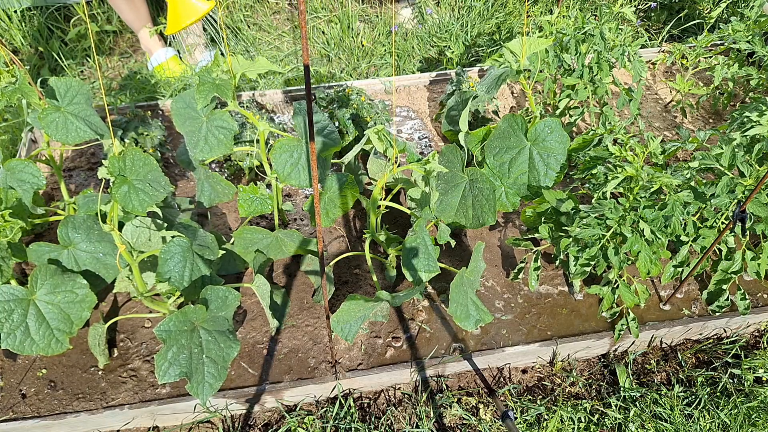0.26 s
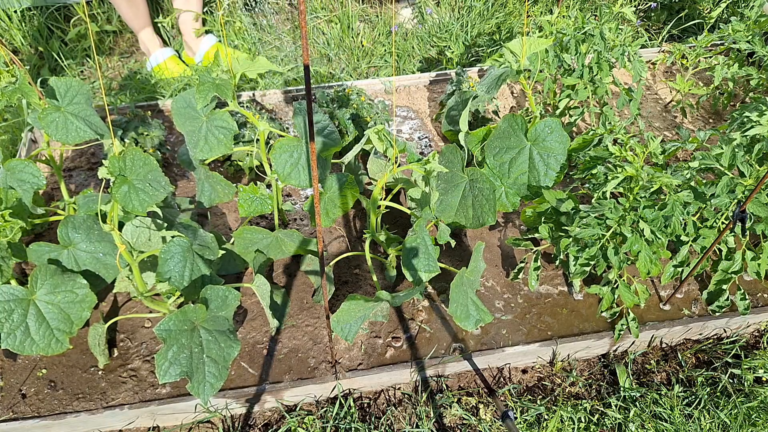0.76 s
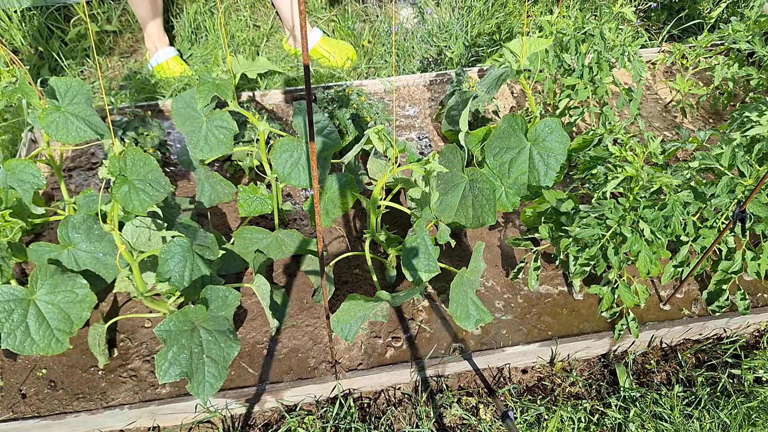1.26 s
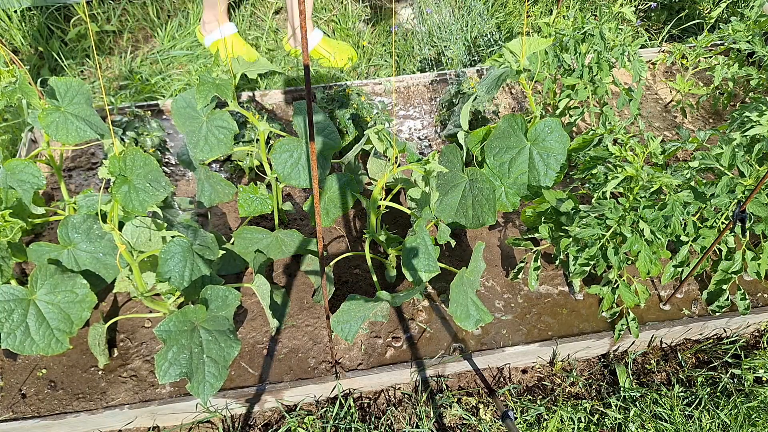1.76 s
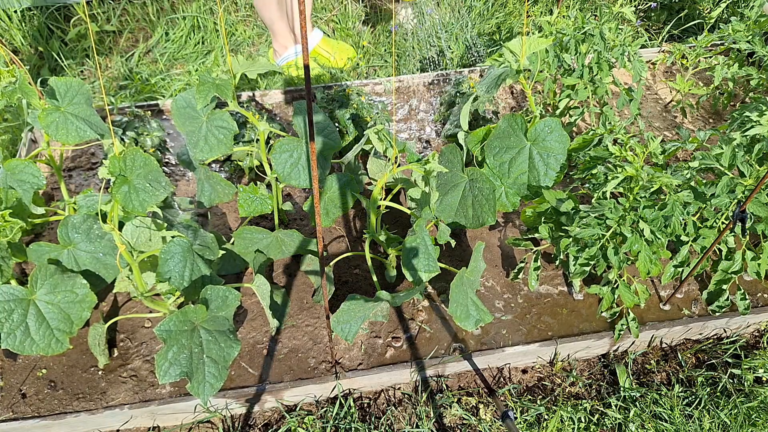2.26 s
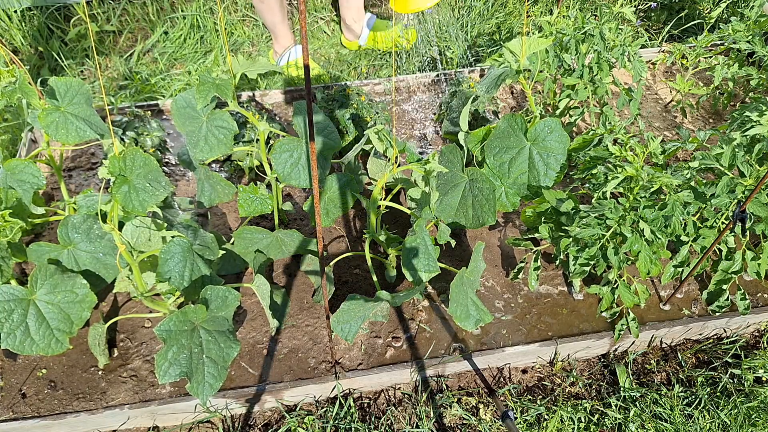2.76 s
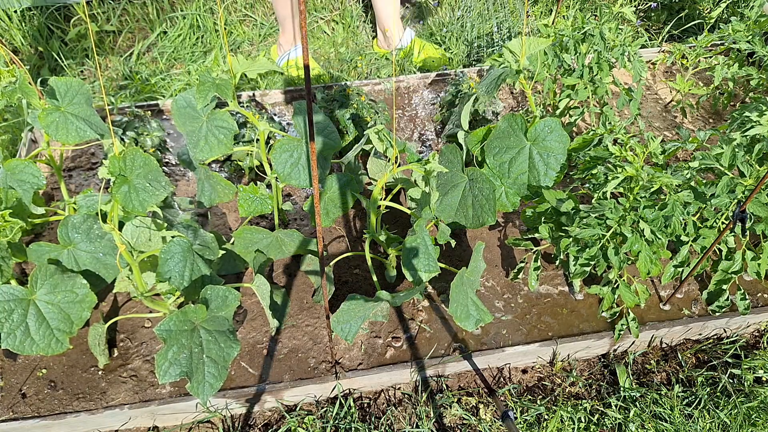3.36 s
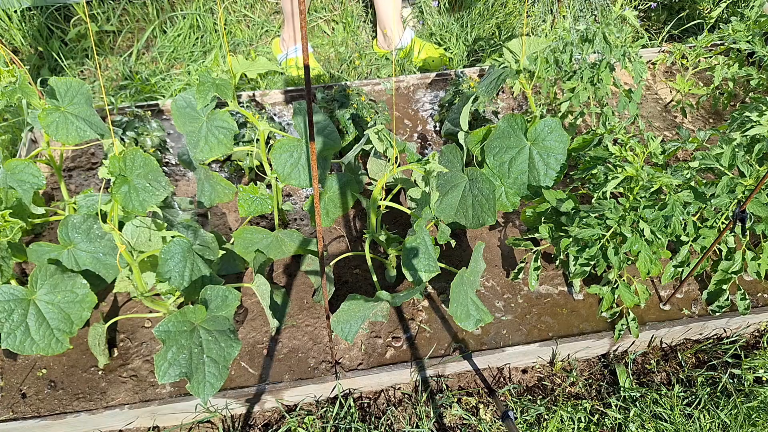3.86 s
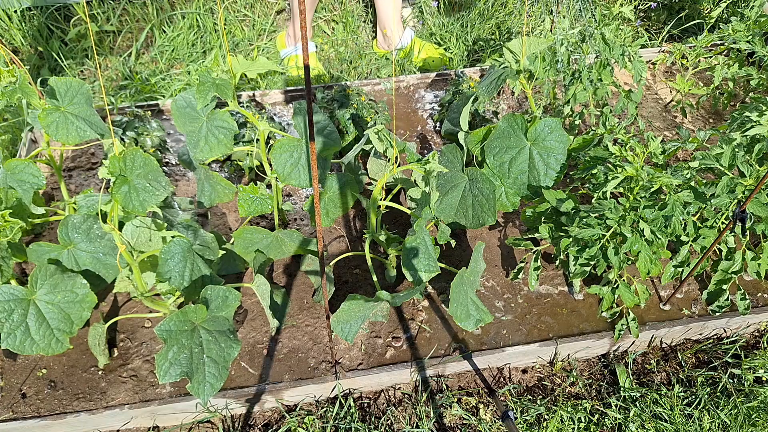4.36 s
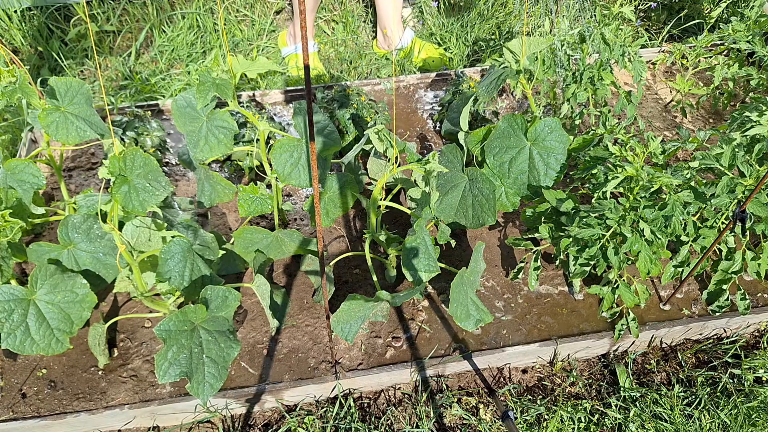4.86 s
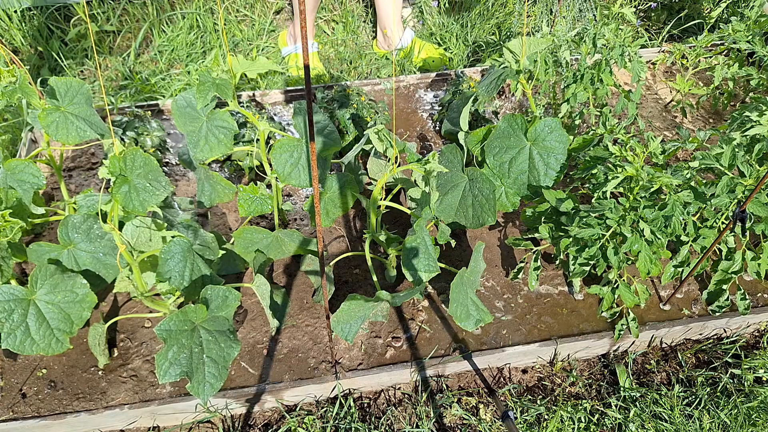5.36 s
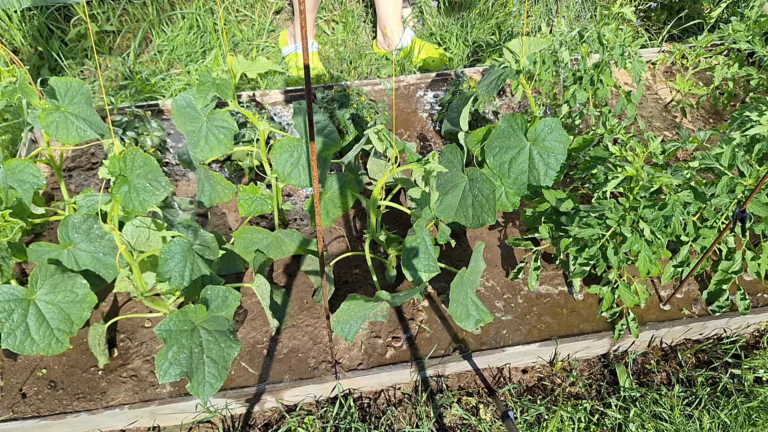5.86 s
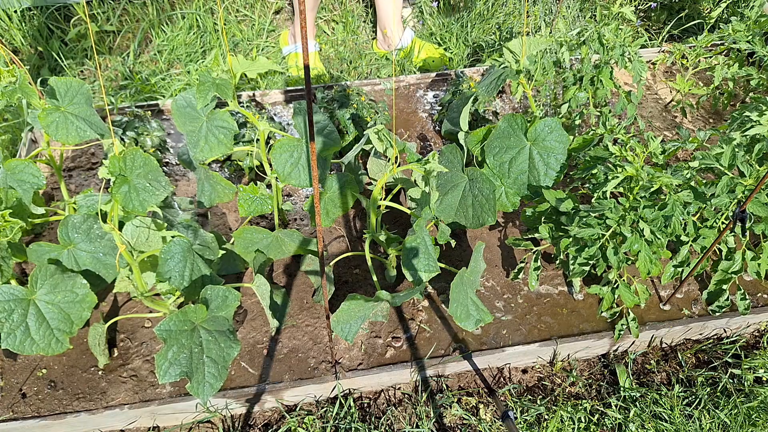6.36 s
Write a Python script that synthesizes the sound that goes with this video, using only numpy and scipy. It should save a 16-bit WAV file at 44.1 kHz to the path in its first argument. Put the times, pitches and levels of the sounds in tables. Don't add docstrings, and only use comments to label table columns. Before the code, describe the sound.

Fine watering-can spray hisses over leaves and wet soil as a nearby warbler sings scratchy phrases and wind thumps the microphone.

```python
import sys
import numpy as np
from scipy import signal
from scipy.fft import rfft, irfft, next_fast_len
from scipy.io import wavfile
from scipy.ndimage import uniform_filter1d

SR = 44100
rng = np.random.default_rng(int(sys.argv[2]) if len(sys.argv) > 2 else 0)


def to_wav(sig):
    pcm = np.clip(np.atleast_2d(sig), -1, 1) * 32767
    pcm = np.round(pcm).astype(np.int16)
    wavfile.write(sys.argv[1], SR, pcm.T)


def boost(x):
    u = np.asarray(x, float) / 20
    return 10 ** u


N = 291060

# (time [s], spray level [dB], share caught by leaves [dB])
FLOW = [(0.0, -57.5, -1.5), (.3, -58.5, -4), (1.1, -58, -3), (1.55, -60, -9), (1.95, -58.5, -3),
        (2.35, -57.5, -8), (2.6, -56, -5), (3.2, -55, -10), (3.4, -61, -6.5), (3.9, -67, -5.5),
        (4.25, -59.5, -6.5), (4.55, -61.5, -5.5), (4.95, -56, -3), (5.3, -62.5, -3.5), (5.5, -60, -12),
        (5.75, -59, -7), (6.6, -59.5, -3.5)]
# (time [s], length [s], change [dB])
FLOW_SWINGS = [
    (0.342, 0.073, -5),
    (1.261, 0.14, -4.5),
    (1.51, 0.29, -2),
    (3.714, 0.054, 3.5),
    (3.843, 0.083, -2.5),
    (4.024, 0.032, 5),
    (5.211, 0.083, -5),
    (5.728, 0.1, 3.5),
    (6.42, 0.15, -2),
]
# (time [s], length [s], splash level [dB])
SOIL_GAPS = [
    (0.0, 0.074, -67),
    (0.752, 0.53, -66.5),
    (1.335, 0.35, -68.5),
    (1.72, 0.4, -65.5),
    (2.478, 0.85, -67.5),
    (4.79, 0.4, -72.5),
    (5.505, 0.19, -74.5),
    (5.728, 0.088, -88),
]
# (time [s], length [s], fizz level [dB])
PUDDLE_HITS = [
    (5.662, 0.21, -61.5),
    (5.895, 0.12, -61.5),
    (6.005, 0.236, -67),
    (6.21, 0.28, -66.5),
]
# (frequency [Hz], level [dB])
SPRAY_COLOUR = [(2650, -24), (4500, -2.5), (5000, -18), (6130, -5), (9650, 1.5), (12100, 2.5), (13600, 1.5),
                (15100, 4), (15900, 1.5)]
# (frequency [Hz], level [dB])
SPLASH_COLOUR = [(470, -18), (800, -15), (1020, -8), (1250, -6), (1630, -9), (2410, -8.5), (4600, -7.5),
                 (6500, -16), (11000, -120)]
# (frequency [Hz], level [dB])
LEAF_COLOUR = [(2200, -30), (3500, -20), (4500, -10), (5200, -3), (6500, -1), (7900, 2), (10000, -16)]
# (frequency [Hz], level [dB])
FIZZ_COLOUR = [(1800, -30), (2500, -5.5), (3200, -2), (4200, -2), (5400, -22)]
# (time [s], peak [dB], pitch [Hz], left-right [dB])
LEAF_DROPS = [(0.081, -43, 6980, -1), (0.6868, -46.5, 7350, 25), (1.144, -41, 12700, -2),
              (1.2635, -37, 7460, -3), (1.5046, -46, 7940, -8), (1.5244, -42, 13600, -11),
              (1.5683, -42.5, 8460, -8), (1.6759, -41, 7500, -10), (1.7686, -44.5, 10200, -1),
              (1.8512, -40.5, 7050, -5), (2.0288, -42, 13200, -4.5), (2.0946, -38.5, 12600, -4),
              (2.5034, -42, 13500, -3), (2.5825, -43, 12200, 16), (2.9562, -38, 8000, -7),
              (2.9941, -37, 14100, -2), (3.1203, -47, 13100, 0), (3.1443, -38.5, 8060, -7),
              (3.4658, -43.5, 8700, -24.5), (3.5916, -40, 7200, -6), (4.2126, -43, 7800, -17),
              (4.518, -41.5, 6000, -13), (4.576, -42, 8000, -20), (4.6907, -42.5, 7800, -15),
              (4.7445, -38, 8000, -12), (4.8294, -40, 7900, -15), (4.972, -43, 12900, -13),
              (5.4655, -45, 11200, -19), (5.7448, -45, 12400, -15), (6.169, -43, 10400, -8),
              (0.1979, -44, 8150, -3), (0.2753, -45, 7800, -3), (0.331, -46, 14500, 1),
              (0.596, -46, 6600, -2), (1.878, -45, 14000, -6), (2.131, -47, 7750, -3),
              (2.347, -49, 10900, -8), (2.409, -44, 14400, 0), (3.184, -42, 12500, -6),
              (4.054, -46.5, 8000, -11), (5.324, -50, 11900, -11), (5.6925, -46, 13900, -8),
              (5.798, -42, 14500, -8), (6.407, -43, 13600, -6)]
# (time [s], peak [dB], pitch [Hz], left-right [dB])
LEAF_TICKS = [(0.3202, -46, 6470, 2), (0.7347, -43, 7010, 0.5), (1.0136, -47, 5450, 7),
              (2.0188, -46.5, 4730, 4.0), (2.4224, -46, 3770, -4), (2.5541, -39.5, 3580, -3),
              (3.0944, -45, 2990, -5), (3.2874, -53, 4790, -2), (3.709, -52, 6760, -1),
              (3.7283, -45, 7500, -4.0), (3.7563, -43.5, 6900, -3), (3.7944, -54, 7150, -1.5),
              (4.3574, -55, 5330, -6), (4.3929, -65, 7260, -4.0), (4.7074, -47, 6420, -3.5),
              (4.7328, -45, 5490, -2), (4.7681, -45, 7200, -2.5), (4.805, -50, 3170, -9),
              (4.8893, -48, 6590, -7), (5.7324, -45, 7360, -4)]
# (time [s], peak [dB], pitch [Hz], left-right [dB])
PUDDLE_PLOPS = [(0.7696, -43, 1470, 5), (0.823, -42.5, 1250, -7), (0.9223, -39, 2360, -4),
                (1.1994, -47, 1460, 5), (2.5162, -38.5, 1230, -2), (2.7018, -43, 2610, 2.0),
                (4.8229, -49, 1930, 3.5), (5.239, -47, 3580, -3), (5.5139, -46, 2280, 0),
                (5.5677, -47, 2130, 0), (5.9194, -44, 1830, -3), (0.76, -50, 1700, 3),
                (0.781, -56, 1360, 3), (0.826, -48, 2050, 1), (0.86, -54, 2350, -4), (1.02, -41, 1120, -3),
                (1.09, -46, 2430, 2), (0.915, -48, 2650, -5)]

# (time [s], first pitch [Hz], level [dB])
PHRASES = dict(chirp=[(.41, 6270, -44.5), (1.304, 6470, -43), (3.918, 6410, -45)], rise=[(1.853, 3990, -44),
           (5.358, 4220, -55)], climb=[(1.9, 4600, -45.5), (5.4, 4950, -47.5)], hum=[(1.918, 5400, -42),
           (1.955, 4050, -63), (5.61, 4420, -56), (5.79, 5500, -50), (5.79, 4000, -53.5), (6.12, 5500, -50),
           (2.785, 4700, -46.5)], scold=[(2.346, 3800, -43), (5.845, 3760, -47)],
           tumble=[(6.177, 4050, -53.5)], hook=[(2.019, 5510, -44)], slide=[(5.522, 4700, -48.5)],
           flick=[(2.155, 3620, -43), (5.652, 3790, -55)], pipe=[(2.731, 3960, -42)],
           jab=[(2.653, 2820, -44)], ringing=[(.442, 3670, -52), (.442, 4150, -51.5), (1.336, 3760, -53),
           (1.336, 4140, -57), (3.95, 3730, -55), (3.95, 4140, -55.5)], rasp=[(2.249, 4770, -39.5),
           (5.753, 4940, -42.5), (6.078, 4760, -49)], zigzag=[(2.913, 3100, -42)],
           whistle=[(2.632, 3650, -54), (6.408, 3910, -47.5)], held=[(6.448, 4130, -61.5)],
           grate=[(2.775, 5150, -41.5)], buzz=[(2.575, 3610, -42.5)], churr=[(2.09, 3850, -49.5),
           (2.115, 3500, -42.5), (5.8, 3500, -52), (2.9, 5600, -51), (1.6, 5600, -62), (3.19, 4050, -47.5)],
           up=[(3.04, 2260, -52.5)], down=[(3.004, 2750, -54.5), (3.058, 2760, -54.5),
           (6.547, 4150, -55.5)], tick=[(2.645, 5750, -45), (3.168, 5130, -54), (6.53, 5130, -54)])
# (length [s], from [Hz], to [Hz], level [dB], sweeps [1/s], 0
SYLLABLE_NOTES = dict( rise=[(.037, 3950, 4350, 0, 82), (.013, 4500, 4700, -6, 80)],
               hook=[(.011, 5500, 4800, -6, 0), (.022, 4850, 4550, -3, 0), (.011, 4600, 3600, 2, 0),
               (.028, 4300, 3550, 0, 0)], slide=[(.034, 4750, 4300, 0, 0), (.05, 4100, 3700, -7, 100)],
               flick=[(.008, 3650, 4500, 1, 0), (.005, 4500, 4500, -30, 0), (.015, 4500, 3500, 0, 0),
               (.022, 3500, 3100, -4, 200)], zigzag=[(.014, 3200, 4150, -4, 0), (.012, 4200, 3500, 0, 0),
               (.005, 3600, 4200, -5, 0), (.006, 3400, 3400, -30, 0), (.013, 4050, 3100, -2, 0)],
               whistle=[(.008, 3900, 4220, -5, 0), (.03, 4230, 4230, 0, 0)], pipe=[(.024, 3950, 4150, 0, 0),
               (.007, 4200, 3700, -1, 0)], jab=[(.006, 2850, 3900, 0, 0), (.008, 3900, 3800, -4, 0)],
               ringing=[(.012, 3800, 3660, -7, 0), (.024, 3680, 3520, 0, 0), (.035, 3620, 3560, -9, 140),
               (.04, 3640, 3580, -14, 0)], held=[(.016, 4200, 4180, 1, 0), (.03, 4200, 4180, -2, 0),
               (.04, 4150, 4220, 2, 0)], grate=[(.014, 5300, 5150, -2, 200), (.032, 5150, 5000, 1, 140)],
               buzz=[(.02, 3650, 3950, -4, 160), (.027, 3950, 4250, 0, 200)],
               churr=[(.044, 3900, 3600, 0, 190)], up=[(.016, 2200, 2700, 0, 0)],
               down=[(.021, 2750, 2050, 0, 0)], tick=[(.02, 5600, 4950, 0, 0)])
# (length [s], from [Hz], to [Hz], level [dB], sweeps [1/s], 0 = pure slur)
MORE_NOTES = dict(climb=[(.065, 4500, 5050, 0, 190)], hum=[(.045, 4400, 4420, 0, 210)],
               rasp=[(.05, 4700, 4950, -1, 58)], scold=[(.018, 3800, 3900, 0, 0),
               (.03, 3800, 3350, -1, 120), (.1, 3050, 2950, -16, 110)], tumble=[(.014, 4050, 3850, 0, 0),
               (.028, 3800, 3250, -1, 0)])
# (length [s], from [Hz], to [Hz], level [dB], sweeps [1/s])
CHIRP_NOTES = dict(chirp=[(.014, 6300, 6100, -18, 0), (.024, 5700, 4600, -4, 190),
              (.034, 4050, 3700, -4, 330), (.022, 3500, 3000, -5, 160)])
# (time [s], length [s], from [Hz], to [Hz], level [dB])
HEN_NOTES = [(0.695, 0.075, 315, 295, -57), (0.912, 0.085, 310, 290, -57), (1.37, 0.09, 290, 272, -58),
             (0.82, 0.28, 1220, 1250, -66), (4.3, 0.4, 362, 376, -62), (4.68, 0.45, 374, 388, -61),
             (2.3, 0.5, 385, 405, -65), (2.8, 0.22, 400, 425, -66), (3.05, 0.25, 430, 420, -65),
             (4.33, 0.44, 2180, 2150, -75), (3.46, 0.05, 2320, 2300, -75)]

# (time [s], level [dB], left-right [dB])
BREEZE = [(0.0, -40.5, 8), (.45, -46.5, 1.5), (1.3, -47.5, 1.5), (1.9, -47, 2.5), (2.4, -46, -4),
          (3.3, -43.5, 3), (3.9, -49, 1), (4.6, -43.5, -4), (5.3, -51.5, -1), (5.8, -43, -1.5),
          (6.6, -49.5, -2)]
# (peak time [s], half length [s], level [dB], left-right [dB])
GUST_SWELLS = [(0.01, 0.023, -39, 7), (0.191, 0.11, -31, 31), (0.533, 0.018, -40, -20),
               (1.989, 0.1, -43, 26), (2.202, 0.069, -38.5, -23), (2.474, 0.013, -25, -25),
               (2.578, 0.086, -31, -13), (2.732, 0.055, -32.5, -23), (2.937, 0.15, -39, 2),
               (3.091, 0.09, -34.5, 1.5), (3.3, 0.062, -43, -20), (3.63, 0.15, -40, -26),
               (4.068, 0.078, -37.5, 1.5), (4.233, 0.059, -32.5, 7), (4.643, 0.061, -41.5, -7),
               (4.917, 0.11, -33.5, -28), (5.067, 0.058, -37, 2), (5.907, 0.061, -40.5, 0),
               (6.065, 0.045, -37.5, 8)]
# (time [s], peak [dB], pitch [Hz], left-right [dB])
EDDIES = [(0.169, -28.5, 77.5, 26), (0.19, -16.5, 80, 34), (0.213, -24, 57, 26), (0.298, -31.5, 76.5, 16),
          (1.804, -32, 71, 25), (2.22, -40, 85, -1), (2.455, -35, 76, -32), (2.527, -25.5, 108, -20),
          (3.119, -40, 67, 8.5), (3.637, -25, 55.7, -28), (4.067, -34.5, 121, 21), (4.882, -24, 64.4, -29),
          (4.922, -24, 76, -20), (5.005, -35.5, 62, 0), (5.863, -40, 72, 7)]
# (frequency [Hz], level [dB])
WIND_COLOUR = [(12, -41), (25, -17.5), (40, -2.5), (55, 7.0), (100, -0.5), (140, -13.0), (200, -22.5),
               (350, -33.5), (700, -66.0)]
# (time [s], level [dB])
TRAFFIC = [(0.0, -66), (0.39, -64), (2.52, -60), (3.1, -56.5), (3.38, -59), (3.9, -60), (4.78, -57),
           (6.6, -58.5)]
# (frequency [Hz], level [dB])
TRAFFIC_COLOUR = [(88, -7), (150, 0.5), (169, -13.5), (304, -19), (363, -19), (389, -18.5), (709, -14),
                  (1540, -30), (2500, -43.5), (3250, -35.5), (5500, -120)]
# (frequency [Hz], level [dB])
TYRE_COLOUR = [(150, -5.5), (350, 6.0), (700, 1.0), (1500, -5.5)]
# (frequency [Hz], level [dB])
AIR_COLOUR = [(700, -11), (1200, -3.5), (2300, 0.5), (4500, -3.5), (8000, -36)]
# (frequency [Hz], left-right [dB])
PORT_COLOUR = [(60, 0), (110, 4.5), (200, 3), (380, 1), (700, 0.5), (1290, 1), (2380, 3.5), (4400, 0.5),
               (8120, -2.5), (15000, -8.5)]


def colour(x, points):
    size = next_fast_len(N + 4096)
    hz, db = np.transpose(points)
    bins_hz = np.linspace(1, SR / 2, size // 2 + 1)
    gain = boost(np.interp(np.log(bins_hz), np.log(hz), db))
    cepstrum = irfft(np.log(gain), size)
    cepstrum[1:(size + 1) // 2] *= 2
    cepstrum[size // 2 + 1:] = 0
    return irfft(rfft(x, size) * np.exp(rfft(cepstrum)), size)[..., :N]


def rms_one(x):
    return x / np.sqrt(np.mean(x ** 2) + 1e-20)


def in_time(rows):
    s, *columns = np.transpose(rows)
    return [np.interp(np.arange(N) / SR, s, c) for c in columns]


def drift(rate):
    r = np.exp(-80 * np.pi * rate / SR)
    slow = signal.lfilter([1], [1, -2 * r, r * r], rng.standard_normal(N // 40 + 2002))
    slow = slow[2000:]
    return np.interp(np.arange(N) / 40, np.arange(len(slow)), rms_one(slow))


def sides(pan_db):
    left = boost(np.asarray(pan_db))
    gains = [left, left ** 0] / np.sqrt((left ** 2 + 1) / 2)
    return np.reshape(gains, (2, -1))


def hiss(flicker_db, rate):
    return rng.standard_normal((2, N)) * boost(flicker_db * drift(rate))


def add(out, s, pitch, level):
    at = round(s * SR)
    tone = level * np.sin(2 * np.pi * np.cumsum(pitch) / SR)
    out[at:at + len(pitch)] += tone[:N - at]


def swell(length, edge):
    along = np.linspace(0, 1, round(length * SR))
    return along, np.clip(np.minimum(along, 1 - along) / edge, 0, 1)


def water():
    flow_db, caught_db = in_time(FLOW)
    spray_db = flow_db + swings()
    leaf_db = spray_db + caught_db
    mist = hiss(1.5, 22) + boost(-2.5) * patter(2000, 3.7, 6500, 15500, 14, clump_db=3.5)
    leaves = hiss(1, 20) + boost(-1) * patter(1000, 3.3, 4000, 8500, 20, clump_db=4)
    slop = hiss(2, 15) + boost(-4) * patter(1500, 2.3, 700, 5000, 30, clump_db=2)
    out = boost(spray_db + 5.5) * rms_one(colour(mist, SPRAY_COLOUR))
    out += boost(leaf_db + 4.0) * rms_one(colour(leaves, LEAF_COLOUR))
    out += boost(swings() + 6.5) * splash_level(flow_db) * rms_one(colour(slop, SPLASH_COLOUR))
    out += boost([[-1.0], [-6.0]]) * snaps(LEAF_DROPS, width=1.12, decay_s=0.0091)
    out += boost(-8) * snaps(PUDDLE_PLOPS, width=1.054, decay_s=0.0067)
    out += boost(-5.0) * snaps(LEAF_TICKS, width=1.09, decay_s=0.0075)
    return out


def swings():
    steps = np.zeros(N)
    for s, length, change_db in FLOW_SWINGS:
        steps[round(s * SR):round((s + length) * SR)] += change_db
    return uniform_filter1d(steps, size=500)


def splash_level(flow_db):
    sheltered_db, follows = -21, 2.53
    gain = boost(-61.0 + sheltered_db + follows * (flow_db + 60.5))
    for s, length, db in SOIL_GAPS:
        gain[round(s * SR):round((s + length) * SR)] += boost(db)
    return uniform_filter1d(gain, size=3000)


def ring(clicks, hz, cycles):
    r = boost(-60 * hz / (cycles * SR))
    w = 2 * np.pi * hz / SR
    return signal.lfilter([0, np.sin(w)], [1, -2 * r * np.cos(w), r * r], clicks + 1e-18)


def patter(per_s, spread_db, low_hz, high_hz, cycles, clump_db):
    sizes = boost(spread_db * np.minimum(rng.exponential(1, N), 5)) * rng.choice([-1, 1], N)
    clumps = boost(clump_db * (.6 * drift(9) + drift(25)))
    landed = rng.random(N) < per_s * clumps / SR
    dealt = rng.integers(0, 20, N)
    lags = rng.integers(-22, 12, 20)
    out = np.zeros((2, N))
    for k, hz in enumerate(np.geomspace(low_hz, high_hz, 20)):
        rung = ring(sizes * landed * (dealt == k), hz, cycles)
        rung = rms_one(rung) * np.sqrt(hz)
        out += [rung, np.roll(rung, lags[k])]
    return rms_one(out)


def snaps(events, width, decay_s):
    out = np.zeros((2, N))
    time = np.arange(int(.04 * SR)) / SR
    fade = np.exp(-time / decay_s) + 0.48 * np.exp(-time / 0.000083)
    bursts = rng.standard_normal((len(events), 2, len(time)))
    for (s, peak_db, hz, pan_db), burst in zip(events, bursts):
        edges = np.clip([hz / width, hz * width], 10, .45 * SR)
        snap = signal.sosfilt(signal.butter(1, edges, "band", fs=SR, output="sos"), burst)
        at = round(s * SR)
        out[:, at:at + len(time)] += boost(peak_db) * sides(pan_db) * snap / np.std(snap) * fade
    return out


def puddle():
    gain = np.zeros(N)
    for s, length, db in PUDDLE_HITS:
        gain[round(s * SR):round((s + length) * SR)] += boost(db)
    fizz = hiss(3.5, 18) + patter(1500, 2.5, 2700, 4600, 25, clump_db=2)
    return uniform_filter1d(gain, size=1500) * rms_one(colour(fizz, FIZZ_COLOUR))


def warbler():
    out = np.zeros(N)
    syllables = SYLLABLE_NOTES | MORE_NOTES | CHIRP_NOTES
    waver = drift(60)
    quaver = 1 + .009 * drift(150)
    for name, times in PHRASES.items():
        notes = syllables[name]
        for s, first_hz, sung_db in times:
            key = first_hz / notes[0][1]
            for length, from_hz, to_hz, db, beats in notes:
                along, envelope = swell(length, .08 if beats else .2)
                here = slice(round(s * SR), round(s * SR) + len(along))
                pitch = key * (from_hz + (to_hz - from_hz) * along) * quaver[here]
                if beats:
                    turns = along * length * beats + .001 * beats * waver[here]
                    beat = np.clip(turns % 1 / min(.8, .008 * beats), 0, 1)
                    depth = min(.33, 210 / beats ** 1.5)
                    pitch *= 1 + np.sign(to_hz - from_hz) * depth * (beat ** 1.6 - .4)
                    envelope *= np.sin(np.pi * beat ** .75)
                add(out, s, pitch, boost(sung_db + db) * envelope)
                s += length
    return out * boost(1.8 * drift(150) + 1.5 * drift(25))


def hens():
    out = np.zeros(N)
    octave_db = -7.5
    for s, length, from_hz, to_hz, db in HEN_NOTES:
        along, envelope = swell(length, .2)
        pitch = from_hz + (to_hz - from_hz) * along
        add(out, s, pitch, boost(db) * envelope)
        add(out, s, 2 * pitch, boost(db + octave_db) * envelope)
    return out * boost(2.5 * drift(12))


def garden(x):
    t60_s, haze_db, echo_db = .5, -41, -20
    time = np.arange(int(.5 * SR)) / SR
    fade = boost(-60 * time / t60_s + haze_db) * (time > .003)
    haze = rng.standard_normal((2, len(time))) * fade
    for echo_s in (.037, .093):
        haze[:, round(echo_s * SR)] += boost(echo_db)
    return signal.fftconvolve(x[None], haze, axes=1)[:, :N]


def wind():
    lumps = rng.standard_normal((2, N)) * boost([1.5 * drift(14), 1.5 * drift(14)])
    out = boost(7.0) * blowing() * rms_one(colour(lumps, WIND_COLOUR))
    pushes = np.zeros((2, N))
    time = np.arange(int(.06 * SR)) / SR
    for s, peak_db, hz, pan in EDDIES:
        push = np.sin(2 * np.pi * 1.25 * hz * time) * np.exp(-time * hz / .6)
        at = round(s * SR)
        pushes[:, at:at + len(time)] += (boost(peak_db + 7.5) * sides(pan) * push)[:, :N - at]
    out += signal.sosfilt(signal.butter(2, [45, 300], "band", fs=SR, output="sos"), pushes)
    return .36 * np.tanh(out / .36)


def blowing():
    level_db, pan_db = in_time(BREEZE)
    power = (boost(level_db) * sides(pan_db)) ** 2
    for s, half, db, pan in GUST_SWELLS:
        along = np.clip((np.arange(N) / SR - s) / half, -1, 1)
        power += (boost(db) * sides(pan) * np.cos(np.pi / 2 * along) ** 2) ** 2
    return np.sqrt(power)


def road():
    hum = colour(rng.standard_normal(N), TYRE_COLOUR)
    hum = hiss(0.34, 11.0) + [hum, np.roll(hum, shift=14)]
    air = colour(rng.standard_normal((2, N)), AIR_COLOUR)
    traffic = boost(in_time(TRAFFIC)[0] + 3.0) * rms_one(colour(hum, TRAFFIC_COLOUR))
    return traffic + boost(-76.0) * rms_one(air)


def scene():
    bird = boost(.5) * warbler()
    hen = boost(-.7) * hens()
    direct = np.array([bird, boost(-1) * np.roll(bird, shift=22)]) + hen
    return direct + garden(bird + hen) + water() + puddle() + road() + wind()


def low_pass(x):
    return signal.sosfilt(signal.butter(12, 17020, fs=SR, output="sos"), x)


def record(dry):
    left = colour(dry[0], [(hz, .5 * db) for hz, db in PORT_COLOUR])
    right = colour(dry[1], [(hz, -.5 * db) for hz, db in PORT_COLOUR])
    top_hz = 15850
    top_cut = signal.ellip(14, .5, 70, top_hz, fs=SR, output="sos")
    mix = signal.sosfilt(top_cut, [left, right])
    return low_pass(mix)


dry = scene()
out = record(dry)
to_wav(out)
```